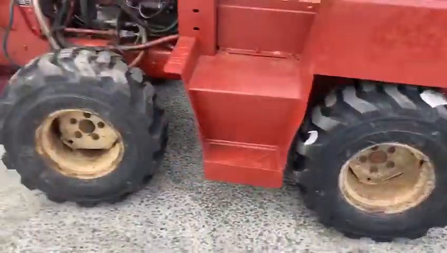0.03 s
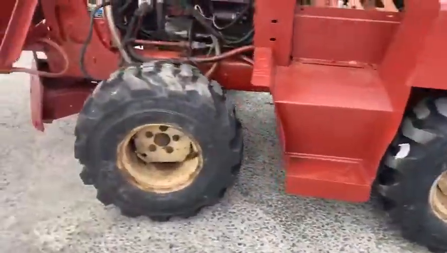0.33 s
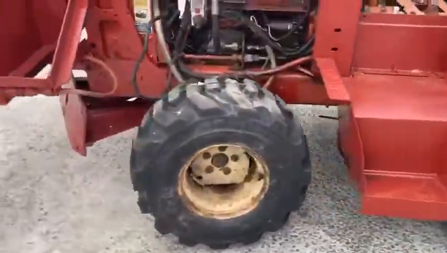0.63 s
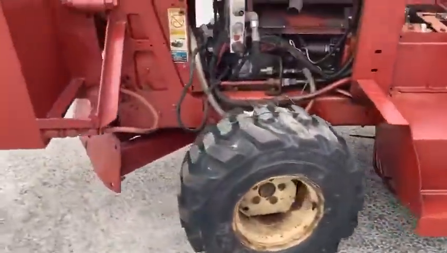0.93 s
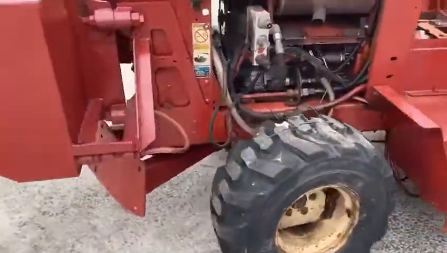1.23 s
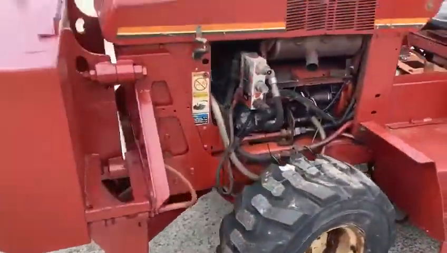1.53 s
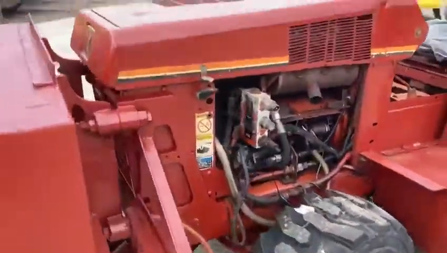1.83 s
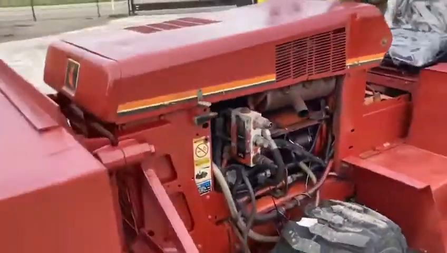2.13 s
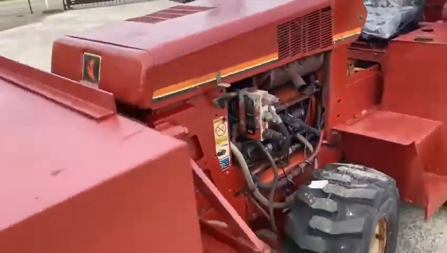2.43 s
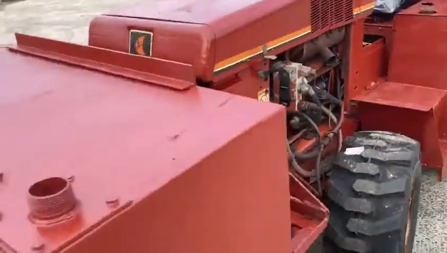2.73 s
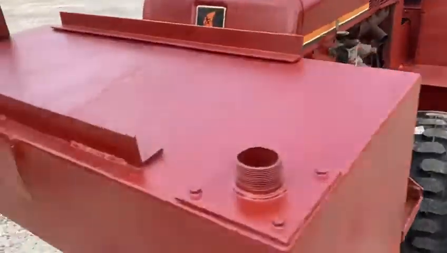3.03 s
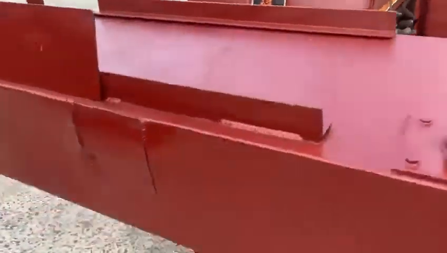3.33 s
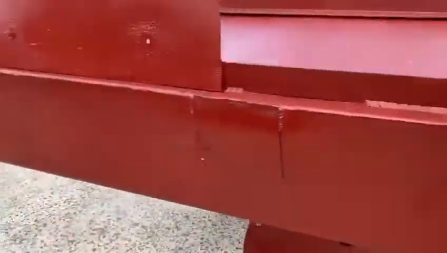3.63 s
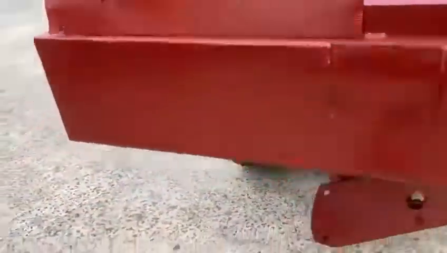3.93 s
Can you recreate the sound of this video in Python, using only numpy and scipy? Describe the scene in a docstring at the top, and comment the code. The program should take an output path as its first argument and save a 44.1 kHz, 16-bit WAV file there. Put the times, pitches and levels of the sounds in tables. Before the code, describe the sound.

The diesel engine of a parked work machine idles in an open yard, with rapid knocking, ticking and rattling over a low throb. The microphone passes close in light wind, then bodywork muffles the higher clatter.

```python
"""Three-cylinder diesel idling on a parked trencher in an open yard, heard walking past its open engine bay.
Firing pulses throb in the exhaust, knock on the block and ring the panels and covers. Timing gears whine
and thump, the injection pump clinks, fittings rattle, the valve gear ticks over fan hiss. Light wind
buffets the microphone pair. Near the end the bodywork screens the engine and shades the treble."""
import sys
import numpy as np
from scipy import signal
from scipy.fft import rfft, irfft
from scipy.io import wavfile

SR = 44100
rng = np.random.default_rng(int(sys.argv[2]) if len(sys.argv) > 2 else 0)


def wav_record(signal):
    """Record a signal, one row per channel, as 16-bit PCM in the file named by sys.argv[1]."""
    frames = np.transpose(np.atleast_2d(signal))
    bounded = np.clip(frames, -1, 1)
    # unit amplitude maps onto the largest positive 16-bit level
    quanta = np.round(bounded * 32767).astype(np.int16)
    wavfile.write(sys.argv[1], SR, quanta)


N = 176400
T, HZ = np.arange(N) / SR, np.fft.rfftfreq(N, 1 / SR)
CYLINDERS, FIRING_HZ = 3, 33.74  # one cycle = 3 firings; order = multiple of the cycle rate

# wind at the microphones (time [s], level [dB])
WIND_LEVEL = [(0, -28), (.45, -38), (.72, -25), (.95, -25.5), (1.5, -40), (2.5, -43), (3.5, -36.5),
              (4, -43)]
# engine noise along the walk (time [s], block [dB], panel [dB], clatter [dB], fan [dB], ticks [dB])
ENGINE_LEVELS = [(0, -25.5, -32, -23.5, -28.5, -31), (.6, -28.5, -32, -24, -27.5, -31.5),
                 (1.1, -29, -29, -25.5, -29.5, -31), (1.6, -28.5, -30, -25.5, -27.5, -29.5),
                 (2.2, -29, -29, -27, -29.5, -31), (2.75, -31, -31, -29.5, -32, -33.5),
                 (3.3, -29.5, -39.5, -32.5, -37.5, -40), (3.65, -30.5, -44, -32.5, -37.5, -49),
                 (4, -27.5, -33.5, -31.5, -38.5, -65)]
# bay parts along the walk (time [s], gear whine [dB], gear thump [dB], clink [dB], rattle [dB])
BAY_LEVELS = [(0, -40, -28, -46, -42), (.6, -30, -27, -41, -47), (1.1, -36.5, -29, -38, -38.5),
              (1.6, -34.5, -24, -41.5, -35), (2.2, -30, -21, -37.5, -34.5), (2.75, -48, -26, -39, -35.5),
              (3.15, -49, -40, -53, -35.5), (3.65, -35.5, -32, -55, -51)]
# exhaust along the walk (time [s], other orders [dB], third firing harmonic [dB])
EXHAUST_LEVELS = [(0, -18, -19), (.4, -15.5, -20), (.9, -19.5, -21), (1.3, -17, -21.5), (2.1, -18.5, -22.5),
                  (2.8, -21, -26), (3.4, -22.5, -33.5), (4, -20.5, -30)]
# exhaust balance (time [s], left minus right [dB])
EXHAUST_PAN = [(0, 0.3), (1.2, -0.8), (3.2, -0.8)]

# exhaust lines; unequal cylinders add weak ones between firing harmonics (order, level [dB])
EXHAUST_ORDERS = [(6, -0.5), (7, -18.5), (8, -28.5), (9, 0.5), (12, -15), (15, -23.5), (18, -21), (20, -20),
                  (21, -25.5)]
# block tones (order before rounding, level [dB], loudest at [s])
BLOCK_ORDERS = [(33, -36.5, 2), (39, -38.5, 1.46), (54, -37.5, 0.098), (57, -40, 0.71), (79.2, -37, 1.07),
                (107.8, -40, 0.1), (164, -38.5, 0.23)]
# cover modes (frequency [Hz], width [Hz], level [dB], loudest at [s])
COVER_RESONANCES = [(1239, 167, -4, .2), (1359, 36, 4.5, 2), (1507, 126, 1.5, 3.6), (1695, 120, -1.5, 4.8),
                    (1886, 85, 2.5, 0.93), (1989, 48, 2.5, 1.6), (2426, 260, -3.5, 3.8),
                    (2790, 61, 1, 1.44)]
# pump and line modes (frequency [Hz], width [Hz], level [dB])
PUMP_RESONANCES = [(3670, 160, 3.5), (4100, 260, -6.5), (4716, 180, 1)]

# combustion knocks (cycle position [firings], clatter [dB], panel [dB])
KNOCK_BLOWS = [(0.12, 3, -11), (1.02, 2, 0), (2.1, 4, -3.5), (0.5, -4, -11.5), (2.5, -3.5, -29)]
# valve ticks (cycle position [firings], bright [dB], lower [dB])
VALVE_BLOWS = [(.42, -9.5, -1), (.93, -20, -21), (1.43, -6, 7.5), (2.44, -0.5, -2.5)]
# pump clinks, gear thumps (cycle position [firings], level [dB])
PUMP_BLOWS = [(1.08, -10), (1.5, -7.5), (1.98, -2.5), (2.62, -2.5)]
GEAR_BLOWS = [(.13, -10), (1.04, 1.5), (2.0, 1.5)]

# spectral shapes (frequency [Hz], relative gain [dB])
WIND_EQ = [(10, -9), (22, -9), (50, -13.5), (90, 5.5), (130, -9), (220, -11), (1500, -69)]
FAN_EQ = [(200, -26), (1500, -6.5), (3300, 1.5), (3650, 5), (4200, 2.5), (4700, 1), (5150, -1.5), (6500, 2),
          (8200, 5), (9500, 1), (10400, 5), (11000, -14), (11500, -15)]
BLOCK_EQ = [(35, -5.5), (60, -1.5), (130, 1.5), (220, -2), (330, -1.5), (480, -4), (600, -7), (900, -11.5),
            (2000, -36.5)]
PANEL_EQ = [(300, -46), (540, -12.5), (660, -7), (750, -1), (830, -1), (980, -9.5), (1600, -24.5)]
CLATTER_EQ = [(400, 6), (800, -5), (1080, 5), (1300, 1.5), (1700, 3.5), (1950, -2.5), (2200, 0), (2500, 2),
              (2820, 0), (3200, -15.5), (3650, -23), (4200, -8), (4700, -11), (5200, -16), (12000, -2.5)]
BRIGHT_TICK_EQ = [(7000, -38), (8300, 0), (9400, -2), (10400, -5), (11100, 3), (11500, 2), (12000, -29)]
LOWER_TICK_EQ = [(2000, -35), (4000, 1), (6000, -1), (8000, 1), (9500, 9.5), (11500, -6)]
COVER_EQ = [(500, 10.5), (1100, -1.5), (3000, -0.5), (5000, -22.5), (9000, -1)]
PUMP_EQ = [(2000, -20), (3500, -1), (4800, 2.5), (5200, -24)]

# left-right coherence, clipped to +-1 in use (frequency [Hz], approaching, facing bay, behind bodywork)
MIC_COHERENCE = [(60, 0.97, 1, 1), (504, 0.94, 0.93, 0.98), (1350, 1, 1, 0.88), (1990, 0.098, 0.84, 1),
                 (2620, 0.89, 0.29, 0.86), (2880, 0.37, -0.33, 0.48), (3740, .35, 0.91, -0.14),
                 (4660, 0.44, 0.85, -0.37), (5130, -0.93, 0.18, -1.01), (5720, -0.4, -0.64, -1.06),
                 (6540, 0.42, 1, 0.95), (7300, 1, 1, 1)]
COHERENCE_AT_S = (0.12, 2.78, 3.02)
# microphone balance (frequency [Hz], left minus right [dB])
MIC_BALANCE = [(60, -1.5), (180, -1.3), (300, 0), (800, -1.6), (1300, .3), (2000, 1.6), (2700, 5.5),
               (3300, 1.5), (5000, .6), (7000, 0)]
# microphone phase (frequency [Hz], right lead [cycles])
MIC_LEAD = [(7300, 0), (8000, .24), (8500, .5), (9550, .5), (10200, .75), (10600, .92), (11000, 1)]
# engine bearing as the listener turns (time [s], right lag [ms])
MIC_LAG = [(0, 0.14), (1.2, 0.021), (2.5, 0.0057), (3.2, -0.054), (4, -0.076)]


def amp(db):
    """Decibels to gain."""
    return 10 ** (np.asarray(db) / 20)


def unit(x):
    """Scale to rms 1."""
    return x / np.sqrt(np.mean(x ** 2) + 1e-20)


def spectrum(points):
    """Table interpolated over log frequency."""
    hz, value = np.transpose(points)
    return np.interp(np.log(HZ + 1), np.log(hz + 1), value)


def levels(table):
    """One gain curve over time per dB column."""
    time_s, *columns = np.transpose(table)
    return [amp(np.interp(T, time_s, db)) for db in columns]


def drift(rate_hz):
    """Slow random motion, rms 1."""
    return unit(irfft(rfft(rng.standard_normal(N)) / (1 + (HZ / rate_hz) ** 4), N))


def colour(x, eq):
    """Spectral shaping, rms 1."""
    return unit(irfft(rfft(x) * amp(spectrum(eq)), N))


def ring(x, hz, width_hz):
    """One resonance."""
    radius = np.exp(-np.pi * width_hz / SR)
    return signal.lfilter([1 - radius], [1, -radius * np.exp(2j * np.pi * hz / SR)], x).real


def vibration(firings, repeat, memory_s):
    """Dense metal vibration on two paths; a share repeats each cycle, changing slowly along the walk."""
    cycle = firings / CYLINDERS + 1
    cycle_samples = round(SR * CYLINDERS / FIRING_HZ)
    carry = np.exp(-CYLINDERS / FIRING_HZ / memory_s)
    rows = rng.standard_normal((int(cycle[-1]) + 2, 2, cycle_samples))
    rows = signal.lfilter([np.sqrt(1 - carry ** 2)], [1, -carry], rows[1:], axis=0, zi=carry * rows[:1])[0]
    cyclic = np.hstack(rows)[:, (cycle * cycle_samples).astype(int)]
    return np.sqrt(repeat) * cyclic + np.sqrt(1 - repeat) * rng.standard_normal((2, N))


def blows(firings, positions, levels_db, rise_s, decay_s, bed_db, scatter_db):
    """Envelope of uneven blows at set cycle positions, over a steady bed."""
    power = amp(bed_db) ** 2
    for position, db in zip(positions, levels_db):
        cycle, since = np.divmod(firings - position + 2 * CYLINDERS, CYLINDERS)
        age_s = since / FIRING_HZ
        strength = amp(db + scatter_db * rng.standard_normal(size=64))[cycle.astype(int)]
        power = power + (strength * (1 - np.exp(-age_s / rise_s)) * np.exp(-age_s / decay_s)) ** 2
    return np.sqrt(power)


def grains(per_s, spread_db, decay_s=0.00016):
    """Envelope of tiny metal contacts within a blow."""
    sizes = amp(spread_db * np.minimum(rng.exponential(1, N), 4))
    contacts = sizes * (rng.random(N) < per_s / SR)
    return np.sqrt(1 + signal.lfilter([1], [1, -np.exp(-1 / (decay_s * SR))], contacts ** 2))


def covers(x, fall_db_per_s=1.5, vary_db=1.3, vary_hz=12):
    """Engine covers ring; the mode mix shifts from knock to knock and along the walk."""
    modes = 0
    for hz, width_hz, db, peak_s in COVER_RESONANCES:
        gain = amp(db - fall_db_per_s * abs(T - peak_s) + vary_db * drift(vary_hz))
        modes = modes + gain * ring(x, hz, width_hz)
    return colour(modes, COVER_EQ)


def microphones(paths, lag_below_hz=3000):
    """Left takes the direct path; right blends it, time-shifted, with the other path along the walk."""
    direct, other = rfft(paths)
    lag_s = np.interp(T, *np.transpose(MIC_LAG)) / 1000
    shifted = rfft(np.interp(T - lag_s, T, paths[0]))
    direct_right = direct + (shifted - direct) / (1 + (HZ / lag_below_hz) ** 4)
    tilt = amp(spectrum(MIC_BALANCE) / 2)
    lead = np.exp(2j * np.pi * spectrum(MIC_LEAD))
    hz, *spots = np.transpose(MIC_COHERENCE)
    right = 0
    for spot, weights in zip(spots, np.eye(len(spots))):
        coherence = np.clip(spectrum(list(zip(hz, spot))), -1, 1)
        blend = coherence * direct_right + np.sqrt(1 - coherence ** 2) * other
        right = right + np.interp(T, COHERENCE_AT_S, weights) * irfft(blend * lead / tilt, N)
    return np.array([irfft(direct * tilt, N), right])


def wind(common_gain=0.91, gust_db=3.5, gust_hz=5.4):
    """Low buffeting, partly common to both microphones."""
    air = rng.standard_normal((2, N)) + common_gain * rng.standard_normal(N)
    return levels(WIND_LEVEL)[0] * amp(gust_db * drift(gust_hz)) * colour(air, WIND_EQ)


def fan():
    """Broadband air hiss."""
    return colour(rng.standard_normal((2, N)), FAN_EQ)


def fittings(contacts_per_s=700):
    """Loose fittings chatter against the covers at random."""
    contacts = rng.standard_normal((2, N)) * (rng.random(N) < contacts_per_s / SR)
    return covers(np.tanh(contacts))


def injection_pump(firings):
    """Strokes ring the pump and its steel lines."""
    strokes = vibration(firings, repeat=0.2, memory_s=0.84)
    strokes *= blows(firings, *np.transpose(PUMP_BLOWS),
                     rise_s=.0008, decay_s=.006, bed_db=-16, scatter_db=4)
    modes = sum(amp(db) * ring(strokes, hz, width_hz) for hz, width_hz, db in PUMP_RESONANCES)
    return colour(modes, PUMP_EQ)


def valve_gear(firings):
    """Short contacts between firings: a gritty bright sizzle and a smoother, lower tick."""
    positions, bright_db, lower_db = np.transpose(VALVE_BLOWS)
    shape = dict(rise_s=.002, decay_s=.0085, bed_db=-21, scatter_db=1.1)
    bright = rng.standard_normal((2, N)) * blows(firings, positions, bright_db, **shape)
    lower = rng.standard_normal((2, N)) * blows(firings, positions, lower_db, **shape)
    bright *= grains(per_s=2100, spread_db=2.4)
    lower *= grains(per_s=1200, spread_db=2.5)
    return amp(0.5) * colour(bright, BRIGHT_TICK_EQ) + amp(-2) * colour(lower, LOWER_TICK_EQ)


def timing_gears(firings, whine_gain, thump_gain, teeth_per_cycle=60, slack_teeth=.065, rough_hz=45):
    """Rough mesh whine; firings slam the teeth together, so the housing thumps at the same pitch."""
    thumps = blows(firings, *np.transpose(GEAR_BLOWS), rise_s=.003, decay_s=.006, bed_db=-50, scatter_db=4)
    whine = 1 + 0.14 * np.cos(2 * np.pi * (firings - 0.05)) + .3 * drift(rough_hz)
    teeth = teeth_per_cycle * firings / CYLINDERS + slack_teeth * drift(rough_hz)
    return (whine_gain * whine + thump_gain * thumps) * np.sqrt(2) * np.sin(2 * np.pi * teeth)


def block_rumble(firings):
    """Dense low vibration of the block."""
    return colour(vibration(firings, repeat=0.7, memory_s=0.93), BLOCK_EQ)


def block_tones(firings, fall_db_per_s=5, depth_db=8.5, waver_db=0.13):
    """Cycle-locked tones, each swelling as the listener passes its spot."""
    tones = 0
    for order, db, peak_s in BLOCK_ORDERS:
        fall_db = np.minimum(fall_db_per_s * abs(T - peak_s), depth_db)
        gain = amp(db - fall_db + waver_db * drift(rate_hz=3.8))
        tones = tones + gain * np.sin(2 * np.pi * (round(order) * firings / CYLINDERS + rng.random()))
    return np.sqrt(2) * tones


def knocks(firings):
    """Each firing booms in the panels and sets off a sharper clatter that rings the covers."""
    positions, clatter_db, panel_db = np.transpose(KNOCK_BLOWS)
    panel = vibration(firings, repeat=0.72, memory_s=1.4)
    panel *= blows(firings, positions, panel_db, rise_s=.002, decay_s=.010, bed_db=-12, scatter_db=2.8)
    clatter = vibration(firings, repeat=0.84, memory_s=0.88)
    clatter *= blows(firings, positions, clatter_db,
                     rise_s=.0022, decay_s=.014, bed_db=-11, scatter_db=1.14)
    return colour(panel, PANEL_EQ), amp(-4) * colour(clatter, CLATTER_EQ) + amp(-3.5) * covers(clatter)


def exhaust(firings, lag_firings=0.2538, waver_db=0.08):
    """The silencer passes only low harmonics of the firing pulses."""
    other_gain, third_gain = levels(EXHAUST_LEVELS)
    cycles = (firings - lag_firings) / CYLINDERS
    throb = 0
    for order, db in EXHAUST_ORDERS:
        walk_gain = third_gain if order == 3 * CYLINDERS else other_gain
        gain = walk_gain * amp(db - waver_db * drift(rate_hz=8.3))
        throb = throb - gain * np.cos(2 * np.pi * order * cycles)
    return np.sqrt(2) * throb


def scene():
    """One crankshaft times the engine; levels follow the walk; the exhaust leans left, then right."""
    firings = .2 + FIRING_HZ * T + .006 * drift(rate_hz=1.8)
    block_gain, panel_gain, clatter_gain, fan_gain, tick_gain = levels(ENGINE_LEVELS)
    whine_gain, thump_gain, clink_gain, rattle_gain = levels(BAY_LEVELS)
    panel, clatter = knocks(firings)
    paths = (block_gain * block_rumble(firings) + panel_gain * panel + clatter_gain * clatter
             + fan_gain * fan() + tick_gain * valve_gear(firings)
             + clink_gain * injection_pump(firings) + rattle_gain * fittings())
    throb = exhaust(firings)
    paths[0] += throb + block_tones(firings) + timing_gears(firings, whine_gain, thump_gain)  # direct path
    lean = np.sqrt(levels(EXHAUST_PAN)[0])
    return microphones(paths) + throb * np.array([lean - 1, 1 / lean - 1]) + wind()


def record(dry, cutoff_hz=11800):
    """Steep low-pass."""
    lowpass = signal.firwin(401, cutoff_hz, window=("kaiser", 9), fs=SR)
    return signal.oaconvolve(dry, lowpass[None], "same")


dry = scene()
out = record(dry)
wav_record(out)
```